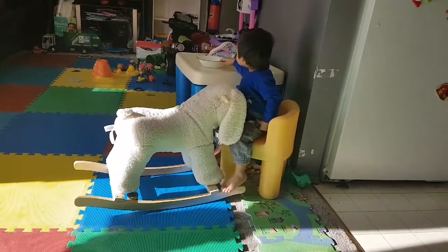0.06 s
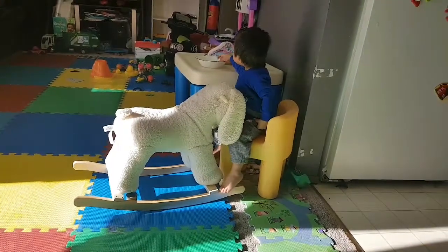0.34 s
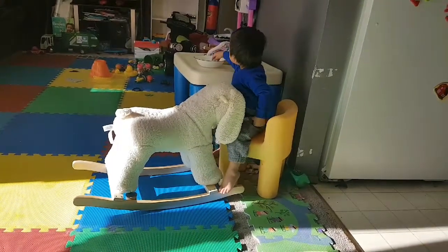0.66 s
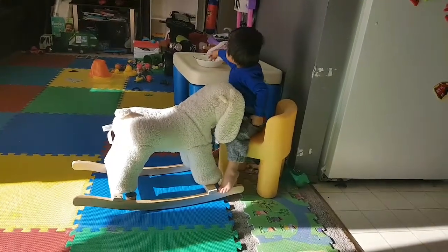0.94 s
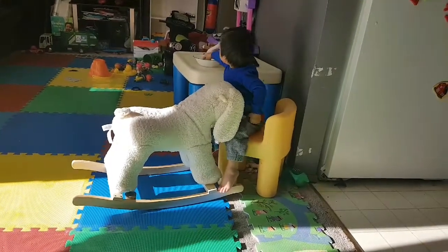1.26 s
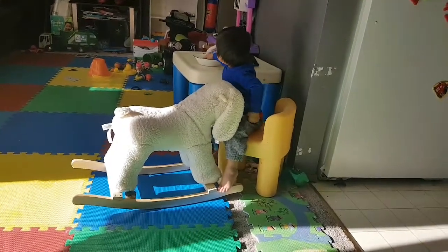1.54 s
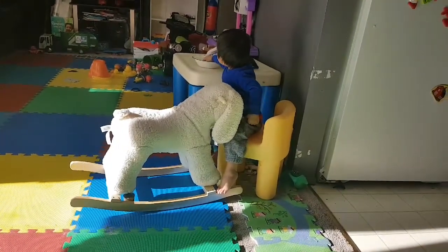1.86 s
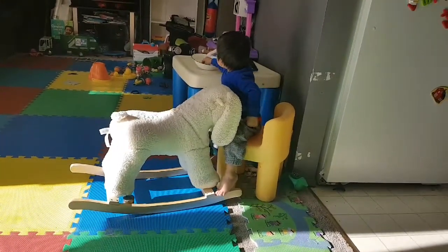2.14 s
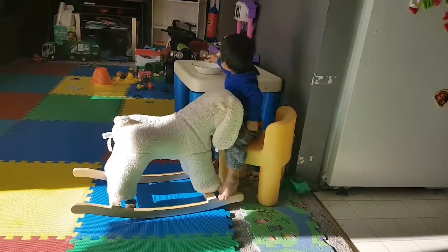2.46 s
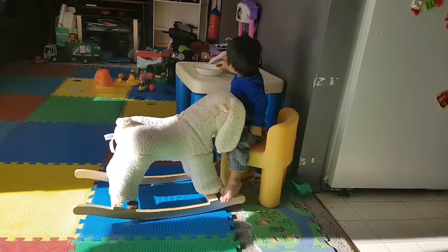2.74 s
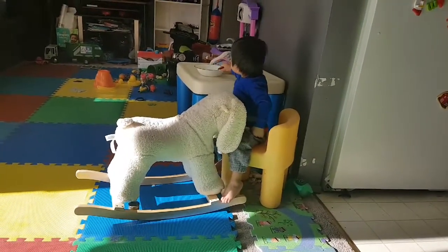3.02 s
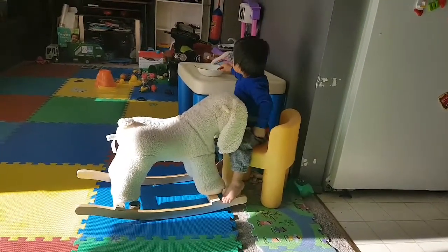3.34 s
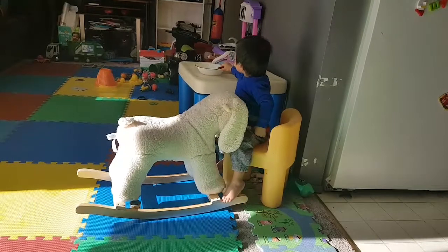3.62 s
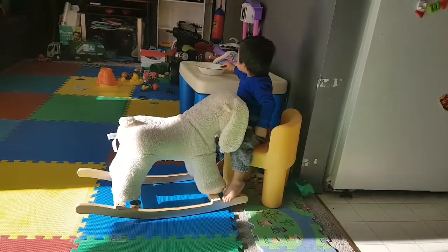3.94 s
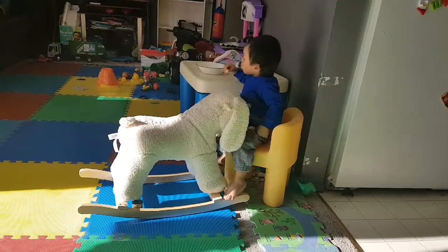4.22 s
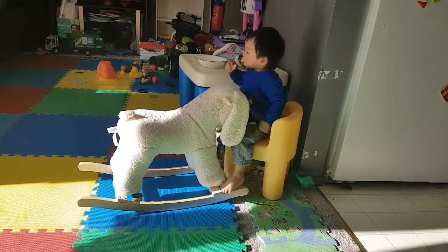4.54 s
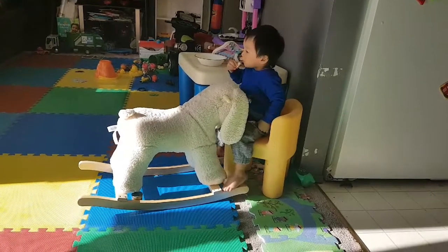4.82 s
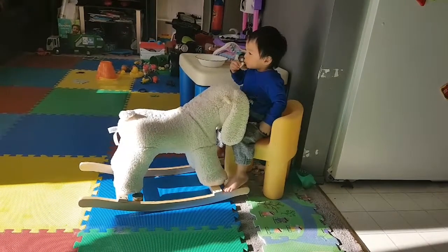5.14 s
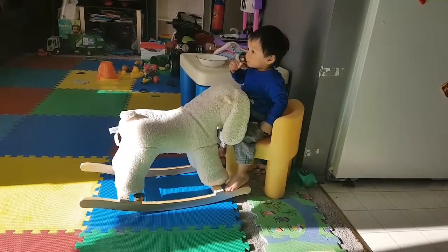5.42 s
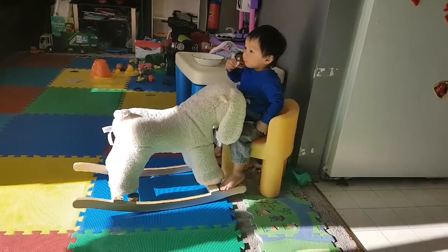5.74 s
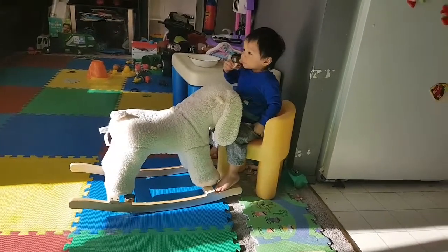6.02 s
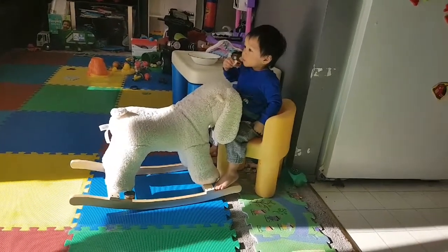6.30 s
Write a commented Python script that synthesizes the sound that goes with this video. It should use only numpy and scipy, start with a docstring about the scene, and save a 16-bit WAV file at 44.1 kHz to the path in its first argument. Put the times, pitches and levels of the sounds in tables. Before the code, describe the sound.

A single loud, hollow knock in a small room, over a quiet hum with a few faint taps.

```python
"""One loud knock on a hollow piece of furniture in a small playroom, heard from a few metres away.
The impact radiates a sharp click and excites damped normal modes: a low boom in the body and a ring
in the panels. Early reflections, a short reverberation and a faint lingering resonance follow.
A toddler at a plastic table makes faint bumps, ticks and slides; a fridge hums over low room rumble."""
import sys
import numpy as np
from scipy import signal
from scipy.fft import rfft, irfft
from scipy.io import wavfile

SR = 44100
rng = np.random.default_rng(int(sys.argv[2]) if len(sys.argv) > 2 else 0)


def waveform_to_disk(signal):
    """Save audio, clipped to [-1, 1], as 16-bit WAV at the path in sys.argv[1]."""
    frames = np.transpose(np.atleast_2d(signal))
    scaled = np.clip(frames, -1, 1) * 32767
    samples = np.round(scaled).astype(np.int16)
    wavfile.write(sys.argv[1], SR, samples)


N = 289737
KNOCK_S = 2.2447


# Spectrum of the contact click. Each row: frequency in Hz, level in dB.
CLICK_SPECTRUM = [(200, -15), (600, -8.5), (1200, -3.5), (1800, -1.5), (2800, -8), (4200, -4), (7000, -7.5),
                  (11500, 1.5), (13000, -12), (15500, -14.5)]
# Arrivals of the click: the direct sound, reflections off nearby surfaces, and at about 11 ms the click of the
# second edge contact. # Each row: delay in seconds, gain in dB, left minus right in dB, treble loss in dB per
# octave above 2 kHz.
CLICK_PATHS = [(0, -1, -4, 0.5), (.0019, -1, 0, 7.5), (.0064, -2, 0, 9.5), (0.0112, 0.5, -6.5, 8.5),
               (0.0135, 2, 2, 5.5), (.021, -7.5, -0.5, 7.5)]
def contact_click():
    """Multipath propagation and a second contact: the click arrives directly, then later and duller off nearby
    surfaces, and again as the other edge lands."""
    out, hz = np.zeros((2, N)), freqs(count=4096)
    octaves_up = np.log2(np.maximum(hz / 2000, 1))
    for delay, db, pan_db, loss_db in CLICK_PATHS:
        click = minimum_phase(undb(curve(CLICK_SPECTRUM, hz) + db - loss_db * octaves_up))
        add(out, KNOCK_S + delay, pan(pan_db) * scatter(click, spread_s=0.00079, share=0.56))
    return out


def scatter(click, spread_s, share, count=256):
    """Diffuse scattering: rough surfaces smear a share of a click's energy over time."""
    smear = rng.standard_normal((2, count)) * np.exp(-np.arange(count) / SR / spread_s)
    smear[:, 0] = 0
    smear *= np.sqrt(share / np.sum(smear ** 2, axis=1, keepdims=True))
    smear[:, 0] = np.sqrt(1 - share)
    return signal.fftconvolve(click[None, :4 * count], smear, axes=1)


# Modes of the hollow body. Each row: frequency in Hz, level in dB, 60 dB decay time in seconds.
BODY_MODES = [(147.7, -25, 0.65), (171, -33, 0.43), (199, -36, 0.59), (223.9, -13.5, 0.19),
              (236.4, -12, 0.35), (266.7, -18.5, 0.21), (286, -29.5, 0.34), (332, -29, 0.28),
              (383, -37.5, .36)]
# The object lands on one edge, then the other. Each row: delay in seconds, gain in dB.
EDGE_CONTACTS = [(0, 1.5), (0.0104, 2.5)]
def body_boom():
    """Impulse excitation: each contact sets the low modes of the hollow body ringing."""
    out, t = np.zeros((2, N)), np.arange(SR) / SR
    for delay, db in EDGE_CONTACTS:
        add(out, KNOCK_S + delay, undb(db) * modal_sum(BODY_MODES, t) * onset(t, rise_s=0.00066))
    return out


# Modes of the panels. Each row: frequency in Hz, level in dB, 60 dB decay time in seconds.
PANEL_MODES = [(461, -34.5, 0.29), (519, -43.5, .27), (569, -46.5, 0.39), (616.3, -41.5, 0.301),
               (675, -42.5, .3), (742, -28.5, .2), (780, -36, 0.28), (823, -34.5, 0.17), (888, -33, 0.31),
               (1224, -46.5, .33), (1382, -47.5, .32), (1623, -30, 0.18), (1746, -50, 0.78),
               (1874, -41, 0.21), (2130, -45, 0.28), (2573, -41, .23), (2877, -40, 0.27)]
def panel_ring():
    """Free vibration: the stiff panels ring at their higher natural frequencies."""
    out, t = np.zeros((2, N)), np.arange(SR) / SR
    add(out, KNOCK_S, modal_sum(PANEL_MODES, t) * onset(t, rise_s=0.0011))
    return out


def modal_sum(modes, t):
    """Superposition of damped modes: neighbours start in antiphase, so their sum swells and beats."""
    return sum((-1) ** k * undb(db) * np.sin(2 * np.pi * hz * t) * decay(t, t60)
               for k, (hz, db, t60) in enumerate(modes))


# Spectrum of the knock's diffuse ring. Each row: frequency in Hz, relative level in dB.
REVERB_SPECTRUM = [(40, -3.5), (80, -8), (120, -24.5), (175, -2.5), (320, -3), (480, -2), (800, -1.5),
                   (1100, -7), (1600, -4.5), (2500, -7.5), (3700, -13), (5000, -13), (8500, -22),
                   (12000, -19.5), (15500, -21)]
def reverberation():
    """Reflections of the knock gather into a dense reverberant field."""
    out, tail = np.zeros((2, N)), room_tail(curve(REVERB_SPECTRUM, freqs()))
    t = np.arange(tail.shape[1]) / SR
    add(out, KNOCK_S, undb(-22.5) * tail * onset(t, rise_s=0.0029))
    return out


# Reverberation time of the room. Each row: frequency in Hz, 60 dB decay time in seconds.
REVERB_TIMES = [(100, 0.55), (300, 0.31), (700, 0.38), (2000, 0.39), (4000, 0.34), (8000, 0.29),
                (15000, 0.2)]
def room_tail(spectrum_db, count=32768):
    """Frequency-dependent damping: each half-octave band of a diffuse field dies at its own rate."""
    noise = level(colour(diffuse(split_hz=750), undb(spectrum_db)), 0)
    bins, t = rfft(noise[:, :count]), np.arange(count) / SR
    octave = np.log2(freqs(count))
    out = 0
    for centre in np.arange(5, 14.6, .5):
        band = irfft(bins * np.maximum(1 - 2 * abs(octave - centre), 0))
        out = out + band * decay(t, curve(REVERB_TIMES, 2 ** centre))
    return out


def lingering_resonance():
    """Light damping lets a faint low resonance outlast the knock."""
    out, t = np.zeros((2, N)), np.arange(N) / SR
    shape = bell(centre_hz=240, octaves=0.31) + undb(-24) * bell(centre_hz=499.6, octaves=0.89)
    noise = level(colour(diffuse(split_hz=880), shape), -45)
    add(out, KNOCK_S, noise * onset(t, rise_s=.03) * decay(t, t60=2.02))
    return out


# Soft bumps against table and chair. Each row: start in seconds, level in dB, centre in Hz,
# width in octaves, decay time constant in seconds.
DULL_BUMPS = [(0.168, -70.5, 583, .35, 0.015), (0.543, -68.5, 330, .35, .07),
              (1.066, -72.5, 494, .65, 0.015), (1.662, -56.5, 165, 1.6, .045),
              (2.199, -55, 226, .55, 0.023), (3.669, -69.5, 630, .25, .02), (4.196, -59.5, 460, 1.55, .005),
              (6.511, -65.5, 1070, .6, 0.052)]
# Ticks of things handled on the table. Each row: start in seconds, level in dB, centre in Hz,
# width in octaves, reverberant-to-direct ratio in dB.
BRIGHT_TICKS = [(1.641, -72, 2170, .75, -12), (1.728, -69, 2650, .9, 5), (4.115, -67, 2870, .6, 10),
                (4.203, -62.5, 1900, .67, -19), (4.362, -70, 2510, 1.1, 0), (4.719, -67, 1800, 1.8, 9),
                (5.211, -70.5, 2190, 1.3, 5), (6.331, -71, 4000, 1.15, 8)]
# Things slid with a rustle or thin squeak. Each row: start in seconds, level in dB, centre in Hz,
# width in octaves.
TABLE_SLIDES = [(0.416, -69.5, 2000, 1.35), (5.302, -67.5, 1800, .13)]
def toddler_handling():
    """Impact and friction: the toddler's bumps, ticks and slides excite the same room response."""
    out, walls = np.zeros((2, N)), room_tail(spectrum_db=0)
    walls = walls / np.sqrt(np.sum(walls ** 2) / 2)
    for start, db, hz, octaves, decay_s in DULL_BUMPS:
        add(out, start, touch(walls, db, hz, octaves, decay_s, room_db=-3))
    for start, db, hz, octaves, room_db in BRIGHT_TICKS:
        add(out, start, touch(walls, db, hz, octaves, decay_s=.016, room_db=room_db))
    for start, db, hz, octaves in TABLE_SLIDES:
        add(out, start, touch(walls, db, hz, octaves, decay_s=.17, room_db=3))
    return out


def touch(walls, db, centre_hz, octaves, decay_s, room_db):
    """Contact noise: a fading run of uneven micro-clicks, heard directly and through the room."""
    count = walls.shape[1]
    grit = rng.standard_normal(count) * undb(2.8 * rng.standard_normal(count))
    grit *= np.exp(-np.arange(count) / SR / decay_s)
    contact = minimum_phase(bell(centre_hz, octaves, count) + undb(-86.5))
    sound = irfft(rfft(grit) * rfft(contact) * (1 + undb(room_db) * rfft(walls)))
    rms = np.sqrt(np.sum(sound ** 2) / (2 * SR * .03))  # as if all its energy fell within 30 ms
    return sound * undb(db) / rms


def fridge(swell_s=5.22, swell_db=4.5, rise_s=.25, fall_s=.95):
    """Narrow-band noise wavers in amplitude: a low hum that swells once, under a steady whirr."""
    lift_db = np.interp(np.arange(N) / SR - swell_s, [-rise_s, 0, fall_s], [0, swell_db, 0])
    hum = resonant_noise(hz=228.1, half_width_hz=12) * undb(-65.5 + lift_db)
    whirr = resonant_noise(hz=1333, half_width_hz=180) * undb(-73)
    return hum + whirr


def resonant_noise(hz, half_width_hz):
    """A resonance passes one band of random excitation; the result has unit rms."""
    response = 1 / (1 + ((freqs() - hz) / half_width_hz) ** 2)
    return level(colour(diffuse(split_hz=490), response), 0)


# Rumble and air of the room. Each row: frequency in Hz, relative spectral density in dB.
AMBIENT_SPECTRUM = [(20, -5.5), (29, -2), (39, 1), (50, -13.5), (78, -2), (105, -19.5), (175, -16.5),
                    (260, -28), (320, -30.5), (660, -32.5), (950, -35), (1900, -36.5), (2800, -38),
                    (3500, -43), (9000, -52.5), (12500, -51), (15000, -51.5)]
def room_rumble():
    """Stationary ambient noise: low rumble with a soft hiss above it."""
    return level(colour(diffuse(split_hz=250), undb(curve(AMBIENT_SPECTRUM, freqs()))), -54.5)


def diffuse(split_hz):
    """Diffuse-field coherence: noise alike at both microphones in the bass, unrelated above split_hz."""
    mid, side = rng.standard_normal((2, N))
    coherence = 1 / (1 + (freqs() / split_hz) ** 2.77)
    mid = colour(mid, np.sqrt((1 + coherence) / 2))
    side = colour(side, np.sqrt((1 - coherence) / 2))
    return np.array([mid + side, mid - side])


# Balance of the two microphones. Each row: frequency in Hz, left minus right in dB.
MICROPHONE_BALANCE = [(450, -2), (1300, -1.5), (2000, -1.5), (2800, -3), (5500, -4.5), (8000, -7),
                      (10500, 3.5), (13000, 2)]
def microphones(x):
    """Frequency response: each microphone colours the treble its own way; long waves reach both alike."""
    hz = freqs(count=1024)
    shading = 1 / (1 + (400 / hz) ** 4)
    gains = pan(curve(MICROPHONE_BALANCE, hz) * shading)
    return np.array([signal.fftconvolve(side, minimum_phase(gain))[:N] for side, gain in zip(x, gains)])


def onset(t, rise_s):
    """Exponential build-up towards full amplitude."""
    return 1 - np.exp(-t / rise_s)


def decay(t, t60):
    """Exponential decay by 60 dB in t60 seconds."""
    return np.exp(-np.log(1000) * t / t60)


def undb(db):
    """Decibels to gain."""
    return 10 ** (np.asarray(db) / 20)


def level(x, db):
    """Set the rms level."""
    return x * undb(db) / np.sqrt(np.mean(x ** 2))


def freqs(count=N):
    """Frequency of each spectral bin, kept above zero."""
    return np.maximum(np.arange(count // 2 + 1) * SR / count, 1)


def curve(points, hz):
    """Interpolate (Hz, value) points on a log-frequency axis."""
    f, value = np.transpose(points)
    return np.interp(np.log(hz), np.log(f), value)


def bell(centre_hz, octaves, count=N):
    """Gaussian gain on a log-frequency axis."""
    return np.exp(-.5 * (np.log2(freqs(count) / centre_hz) / octaves) ** 2)


def colour(x, gain):
    """Filter by a gain for each bin."""
    return irfft(rfft(x) * gain, N)


def minimum_phase(gain):
    """Causal impulse response with the given gain in each bin."""
    cepstrum = irfft(np.log(gain))
    half = len(cepstrum) // 2
    cepstrum[1:half] *= 2
    cepstrum[half + 1:] = 0
    return irfft(np.exp(rfft(cepstrum)))


def pan(db):
    """Left and right gains for a level difference."""
    return undb(np.array([[1], [-1]]) * db / 2)


def add(out, start_s, x):
    """Mix a sound in from start_s."""
    start = int(start_s * SR)
    count = min(x.shape[-1], N - start)
    out[:, start:start + count] += x[..., :count]


def scene():
    """Linear superposition: the knock and the small touches add to the room's background."""
    knock = contact_click() + body_boom() + panel_ring() + reverberation() + lingering_resonance()
    return microphones(knock + toddler_handling()) + room_rumble() + fridge()


def record(dry, cutoff_hz=15750):
    """Band limiting: a steep low-pass filter removes the highest treble."""
    return signal.sosfilt(signal.ellip(10, .2, 70, cutoff_hz, fs=SR, output="sos"), dry)


dry = scene()
out = record(dry)
waveform_to_disk(out)
```